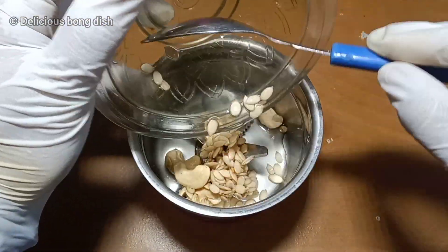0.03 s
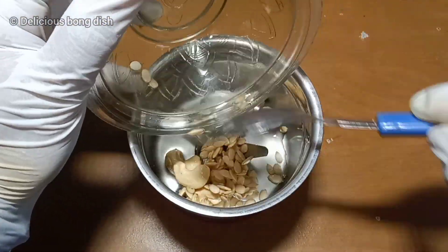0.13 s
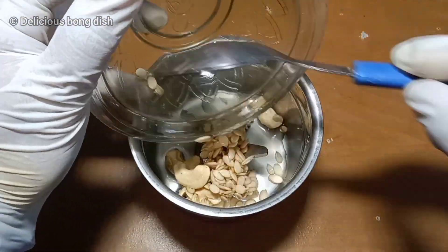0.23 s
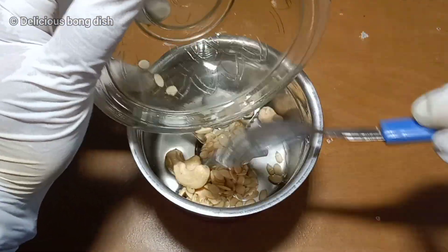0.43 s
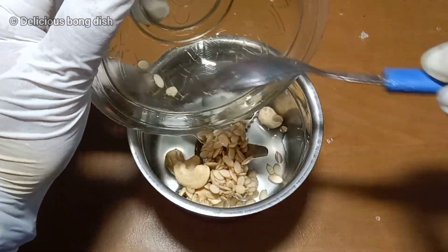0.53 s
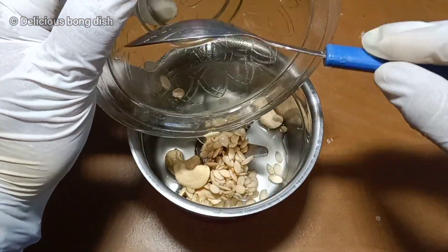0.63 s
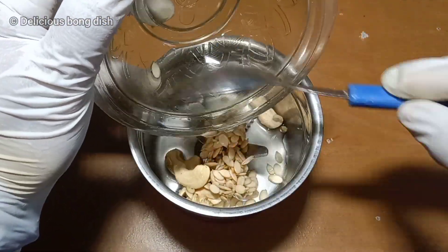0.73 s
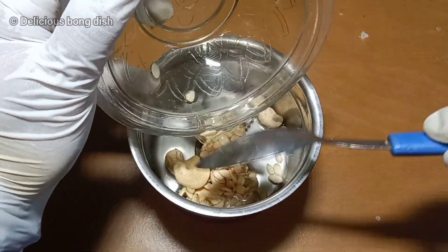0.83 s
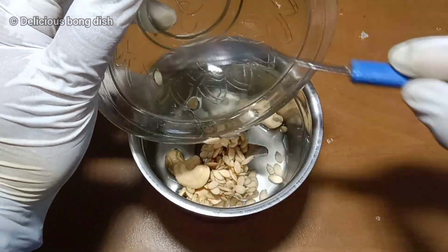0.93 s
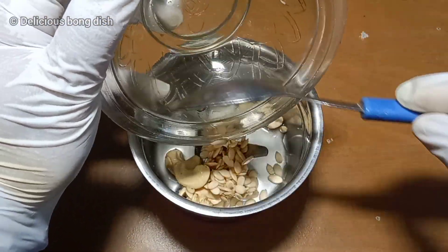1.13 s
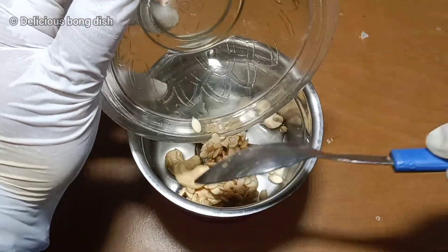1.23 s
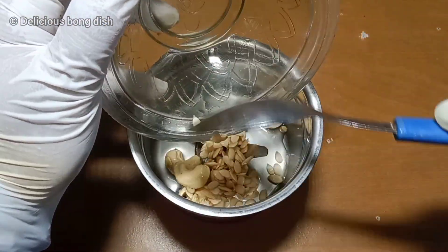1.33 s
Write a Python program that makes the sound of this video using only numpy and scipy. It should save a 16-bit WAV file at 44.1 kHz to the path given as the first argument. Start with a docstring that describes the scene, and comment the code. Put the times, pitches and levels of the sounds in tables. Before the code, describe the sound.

A metal spoon taps and scrapes a plastic container and steel bowl over a low hum.

```python
"""A low, hollow hum fills a kitchen; almost at once a metal spoon clicks, close to the microphone.
It taps and scrapes seeds off a plastic container into a steel bowl. The plastic answers with dry
clicks and knocks; the steel rings briefly at each clink and sings under each scrape.
One seed ticks into the bowl. Near the end the hum drops out briefly and starts to return."""
import sys
import numpy as np
from scipy import signal
from scipy.fft import rfft, irfft
from scipy.io import wavfile
from scipy.ndimage import uniform_filter1d

SR = 44100
rng = np.random.default_rng(int(sys.argv[2]) if len(sys.argv) > 2 else 0)


def wav_record(signal):
    """Record a signal, one row per channel, as 16-bit PCM in the file named by sys.argv[1]."""
    frames = np.transpose(np.atleast_2d(signal))
    bounded = np.clip(frames, -1, 1)
    # unit amplitude maps onto the largest positive 16-bit level
    quanta = np.round(bounded * 32767).astype(np.int16)
    wavfile.write(sys.argv[1], SR, quanta)


N = 61739
TIME = np.arange(N) / SR
FREQS = np.fft.rfftfreq(N, 1 / SR)

# modes of the container's plastic wall: f/Hz, level/dB, t60/s
PLASTIC_MODES = [(1191, -34, 0.26), (2323, -19, 0.068), (2800, -26.5, 0.085), (3547, -20, 0.033),
                 (5370, -32, 0.1), (9900, -41.5, 0.15)]
# modes of the steel: f/Hz, level/dB, t60/s
STEEL_MODES = [(2266.5, 0, 0.15), (5569, -1.5, 0.14), (5598, -3.5, 0.06), (9904, -22, 0.22)]


def amp(db):
    """Decibels to gain."""
    return 10 ** (np.asarray(db) / 20)


def unit(x):
    """Scales to rms 1."""
    return x / np.sqrt(np.mean(x ** 2) + 1e-20)


def add(mix, start_s, sound):
    """Mixes a sound in at a time."""
    part = mix[round(start_s * SR):][:len(sound)]
    part += sound[:len(part)]


def colour(x, spectrum):
    """Minimum-phase filter of unit energy, shaped by rows of f/Hz, level/dB."""
    hz, db = np.transpose(spectrum)
    grid_hz = np.fft.rfftfreq(2 ** 12, 1 / SR)
    gain = amp(np.interp(np.log(grid_hz + 1), np.log(hz + 1), db))
    cepstrum = irfft(np.log(gain))
    half = len(cepstrum) // 2
    causal = np.r_[cepstrum[0], 2 * cepstrum[1:half]]
    taps = irfft(np.exp(rfft(causal, 2 * half)))[:half]
    return signal.fftconvolve(x, taps / np.linalg.norm(taps))[:len(x)]


def resonance(hz, width_hz, steady=0, bend_hz=0):
    """Noise in one resonance; steady evens out its swings in level, bend_hz moves its pitch."""
    spectrum = rfft(rng.standard_normal(N)) / (1 + ((FREQS - hz) / (.5 * width_hz)) ** 2)
    bend_cycles = np.cumsum(bend_hz * np.ones(N)) / SR
    band = np.fft.ifft(spectrum, N) * np.exp(2j * np.pi * bend_cycles)
    return unit(band.real / (abs(band) + 1e-12) ** steady)


def patchy(noise, depth_db=4.5):
    """Narrow bands of a noise swell and sink independently."""
    bands = signal.stft(noise, nperseg=2 ** 10)[2]
    patches = uniform_filter1d(rng.standard_normal(bands.shape), size=4, axis=0)
    patches = uniform_filter1d(patches, size=12, axis=1)
    return signal.istft(bands * amp(depth_db * unit(patches)), nperseg=2 ** 10)[1][:N]


def ring(modes):
    """Dying sines of a struck object."""
    t = TIME[:SR // 2]
    return sum(amp(db - 60 * t / t60) * np.sin(2 * np.pi * (hz * t + rng.random()))
               for hz, db, t60 in modes)


def impact(spectrum, scatter_db, scatter_t60_s):
    """One impulse and its quick scatter inside the container."""
    t = TIME[:SR // 2]
    hit = rng.standard_normal(len(t)) * amp(-60 * t / scatter_t60_s) * (t > .0005)
    hit *= amp(scatter_db) / np.linalg.norm(hit)
    hit[0] += 1
    return colour(hit, spectrum)


def hum():
    """Hollow resonances waver in level all round the room; the lowest also drifts in pitch."""
    # resonances: f/Hz, width/Hz, level/dB
    bands = [(131.7, 31.3, -53), (321, 26, -62), (416.6, 36, -62.5), (731.6, 67, -83), (964, 100, -76.5),
             (1182, 98, -75), (1443, 150, -75), (1980, 230, -78)]
    # wavering: t/s, gain of the lowest/dB, its f/Hz, gain of the others/dB
    wavering = [(0, 8.5, 143.6, 8), (0.219, 11, 139.2, 15), (0.479, 6, 129.4, 14.5),
                (0.642, 9, 121.7, 12.5), (.8, 4.5, 133.2, 13.5), (.92, 10.5, 151.2, 9),
                (1.02, 9.5, 127.7, 10.5), (1.16, 5.5, 128.9, 2.5), (1.223, 13, 128, -0.5),
                (1.269, 3, 128.4, -9.5)]
    times, *columns = np.transpose(wavering)
    low_db, low_hz, upper_db = [np.interp(TIME, times, column) for column in columns]
    hz, width, db = bands[0]
    low = amp(db + low_db) * resonance(hz, width, steady=0.63, bend_hz=low_hz - hz)
    upper = sum(amp(db + upper_db) * resonance(hz, width, steady=0.19) for hz, width, db in bands[1:])
    return low + upper


def room_tone():
    """Broad, uneven noise behind the spoon, with a low rumble that fades out early."""
    # spectrum of the room noise: f/Hz, level/dB
    spectrum = [(25, -26.5), (80, -17.5), (170, -6), (240, -16), (300, -10), (450, -7.5), (570, -37),
                (1100, -30.5), (2100, -35), (3000, -38.5), (5500, -39), (7300, -29), (8800, -31),
                (9600, -58.5)]
    air = amp(-56) * unit(colour(patchy(rng.standard_normal(N)), spectrum))
    rumble_end_s, fade_s = 0.78, 0.62
    fade = np.clip((rumble_end_s - TIME) / fade_s, 0, 1)
    return air + amp(-64) * resonance(hz=61, width_hz=22, steady=0.31) * fade


def clicks():
    """The spoon hits the container's plastic edge: a sharp, dry double click."""
    # hits on the edge: t/s, level/dB
    hits = [(0.052, -5), (0.0565, -9.5)]
    # spectrum of a click: f/Hz, level/dB
    spectrum = [(650, -31), (1150, 5), (2200, -22), (4700, -5.5), (6050, -17), (7100, 3.5), (8400, -5.5),
                (9600, -22), (13400, -17), (16000, -36.5)]
    out = np.zeros(N)
    for start, db in hits:
        add(out, start, amp(db) * impact(spectrum, scatter_db=-2.5, scatter_t60_s=0.055))
    return out


def knocks():
    """Duller hits on the container set its wall ringing."""
    # hits on the wall: t/s, impact level/dB, ring level/dB
    hits = [(0.0686, -18, -18.5), (0.6867, -14.5, -18), (1.0462, -11.5, -11)]
    # spectrum of a knock: f/Hz, level/dB
    spectrum = [(560, -42.5), (1170, 4.5), (2000, -16.5), (2500, 5.5), (3600, -3.5), (7200, -8),
                (9000, -25.5), (12000, -30.5), (15000, -23)]
    out = np.zeros(N)
    for start, db, ring_db in hits:
        knock = amp(db) * impact(spectrum, scatter_db=1.5, scatter_t60_s=0.036)
        add(out, start, knock + amp(ring_db) * ring(PLASTIC_MODES))
    return out


def scrapes():
    """Grainy, chattering friction swells and dies away, and keeps the steel's modes singing."""
    # spoon strokes: t/s, swell/s, release t60/s, rasp level/dB, lowest mode/dB, upper modes/dB
    strokes = [(0.069, 0.0047, 0.1, -44.5, -49, -40.5), (0.109, .018, 0.33, -55, -44, -64),
               (0.136, 0.003, 0.15, -43, -52, -48), (0.157, 0.013, 0.067, -31.5, -56, -30),
               (0.34, 0.0026, 0.055, -36.5, -37, -34), (0.347, 0.011, 0.15, -44, -45.5, -40),
               (0.412, 0.011, 0.07, -45.5, -38, -50), (0.431, 0.022, 0.13, -46.5, -43.5, -52),
               (0.459, 0.014, 0.13, -36, -46, -29.5), (0.487, 0.013, 0.033, -43.5, -34.5, -28.5),
               (0.69, 0.0074, 0.38, -55.5, -55.5, -59), (0.754, .014, 0.1, -46.5, -43, -42),
               (0.997, 0.008, 0.49, -78, -67.5, -66.5), (1.047, 0.0076, 0.09, -43.5, -67.5, -42),
               (1.098, 0.0057, 0.069, -54, -51.5, -64.5)]
    # spectrum of the friction: f/Hz, level/dB
    spectrum = [(600, -30.5), (950, -10), (1300, 2.5), (1900, -6), (2700, 3), (4100, -1), (4900, -4),
                (5900, -2), (6600, -8.5), (7700, -11), (9200, -29), (10200, -23), (12200, -49),
                (15100, -27), (16000, -48)]
    grains_per_s, grain_share, chatter_db = 2400, 0.12, 2.5
    grains = unit(rng.standard_normal(N) * (rng.random(N) < grains_per_s / SR))
    friction = np.sqrt(grain_share) * grains + np.sqrt(1 - grain_share) * rng.standard_normal(N)
    chatter = amp(chatter_db * unit(uniform_filter1d(rng.standard_normal(N), size=130)))
    rasp = unit(colour(patchy(friction) * chatter, spectrum))
    # the upper modes squeal sharp as the spoon presses hardest
    squeal_s, span_s, rise_hz = 0.476, 0.013, 150
    squeal_hz = rise_hz * np.exp(-((TIME - squeal_s) / span_s) ** 2)
    low = resonance(STEEL_MODES[0][0] * 1.02, width_hz=187, steady=0.78)
    upper = unit(sum(amp(db) * resonance(hz, width_hz=200, steady=0.16, bend_hz=squeal_hz)
                     for hz, db, _ in STEEL_MODES[1:]))
    out = np.zeros(N)
    for start, swell, t60, rasp_db, low_db, upper_db in strokes:
        t = TIME - start
        pressure = np.clip(t / swell, 0, 1) * amp(-60 * np.maximum(t - swell, 0) / t60)
        out += pressure * (amp(rasp_db) * rasp + amp(low_db) * low + amp(upper_db) * upper)
    return out


def rubs():
    """Gentle sliding swells the lowest resonance of the container's wall."""
    # soft rubs at their peaks: t/s, level/dB
    slides = [(0.098, -53), (0.615, -57), (0.912, -54.5), (1.108, -53.5), (1.239, -69)]
    span_s = 0.021
    swells = sum(amp(db) * np.exp(-((TIME - peak) / span_s) ** 2) for peak, db in slides)
    return swells * resonance(PLASTIC_MODES[0][0], width_hz=470)


def clinks():
    """Steel modes build up during a short contact and ring until the next touch damps them."""
    # the place of contact decides how much the lowest and the upper modes ring
    # contacts: t/s, build-up/s, time until damped/s, lowest mode/dB, upper modes/dB
    contacts = [(0.1602, 0.0024, 0.0076, -37.5, -18.5), (0.19, 0.0025, 0.052, -53, -39),
                (0.342, 0.003, 0.025, -34, -34), (0.358, 0.002, 0.0072, -39, -29.5),
                (0.4228, 0.0019, 0.0031, -38, -34), (0.479, 0.0079, 0.066, -17, -47),
                (1.12, 0.013, 0.013, -40.5, -53.5)]
    split_hz, damping_s = 4000, 0.0033
    out = np.zeros(N)
    for start, rise, free, low_db, upper_db in contacts:
        tone = ring([(hz, db + (low_db if hz < split_hz else upper_db), t60)
                     for hz, db, t60 in STEEL_MODES])
        t = TIME[:len(tone)]
        damping = np.exp(-(np.maximum(t - free, 0) / damping_s) ** 2)
        add(out, start, tone * np.minimum(t / rise, 1) * damping)
    return out


def seed(start_s=0.217, level_db=-54.5, t60_s=0.027):
    """One seed drops into the bowl with a crisp tick."""
    t = TIME - start_s
    decay = amp(level_db - 60 * abs(t) / t60_s) * (t > 0)
    return decay * resonance(hz=9500, width_hz=1400)


def kitchen(direct, tail_db=-19.5, t60_s=0.22):
    """At close range the room adds only a short, faint tail, duller than the direct sound."""
    t = TIME[:SR // 2]
    dull_noise = signal.lfilter([1, 1], [1], rng.standard_normal(len(t)))
    tail = dull_noise * amp(-60 * t / t60_s) * (t > .004)
    return direct + amp(tail_db) * signal.fftconvolve(direct, tail / np.linalg.norm(tail))[:N]


def scene():
    """Spoon, container and bowl close to one microphone, the humming kitchen behind them."""
    # the background drops out near the end and partly returns: t/s, level/dB
    dropout = [(1.27, -3), (1.277, -32.5), (1.335, -28.5), (1.38, -14)]
    utensils = kitchen(clicks() + knocks() + clinks() + scrapes() + seed())
    background = (hum() + room_tone()) * amp(np.interp(TIME, *np.transpose(dropout)))
    return (utensils + background + rubs())[None]


def record(dry):
    """The recorder's band limit takes off the highest treble."""
    cutoff_hz = 16300
    taps = signal.firwin(511, cutoff_hz, window=("kaiser", 9), fs=SR)
    return signal.oaconvolve(dry, taps[None], "same")


dry = scene()
out = record(dry)
wav_record(out)
```